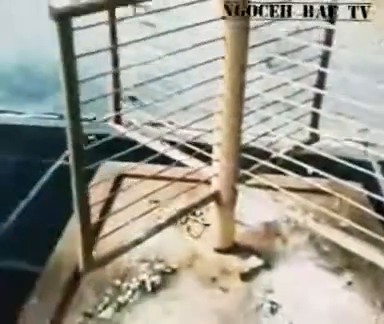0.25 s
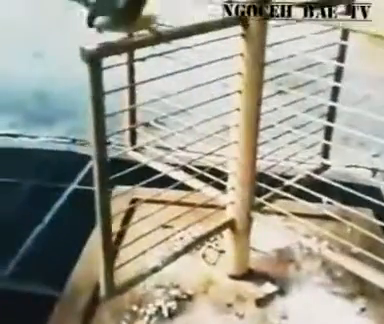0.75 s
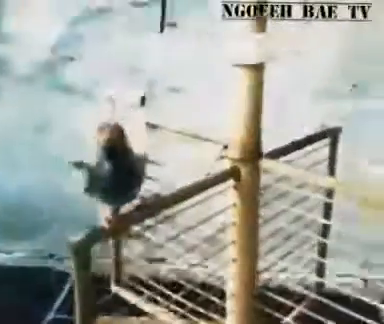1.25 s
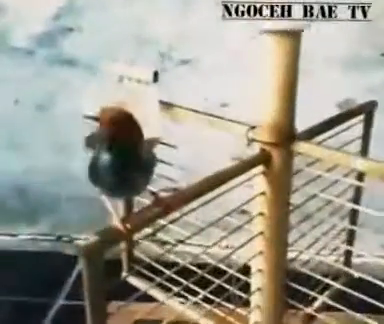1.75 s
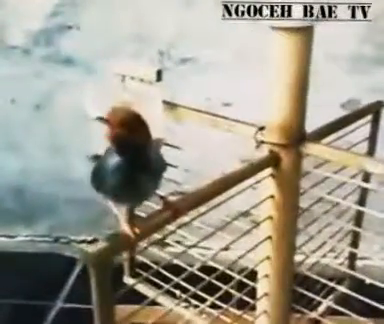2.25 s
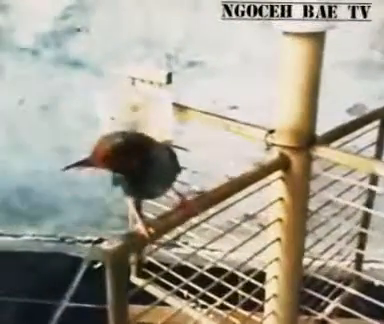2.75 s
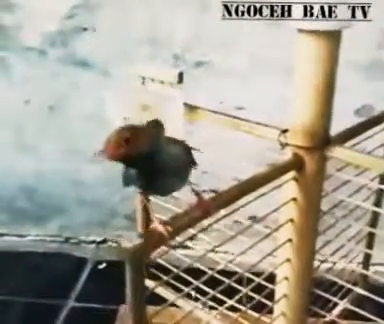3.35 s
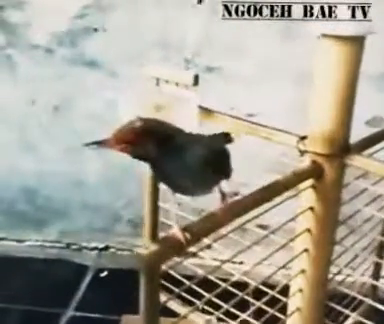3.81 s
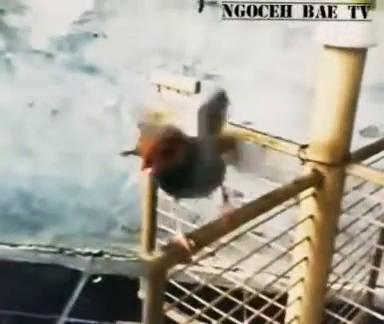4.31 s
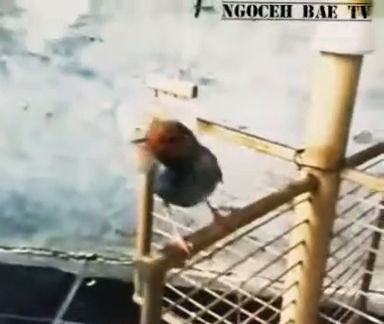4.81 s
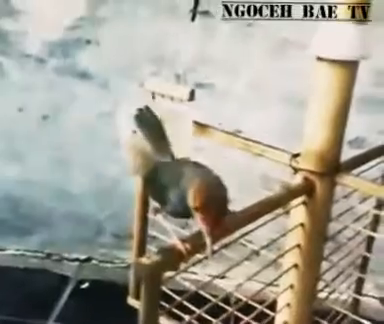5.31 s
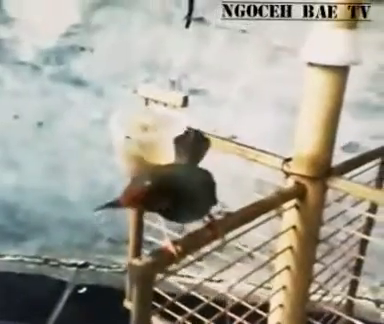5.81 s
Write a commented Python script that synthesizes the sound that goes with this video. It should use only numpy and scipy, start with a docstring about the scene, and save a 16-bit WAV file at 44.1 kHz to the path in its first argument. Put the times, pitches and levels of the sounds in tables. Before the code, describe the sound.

A small songbird on an outdoor terrace, heard close through a simple mono microphone with hard, peaky sound. First comes bright scratching and hollow rustle, then pairs or triplets of quick ticks lead into crisp downward chew calls, with a few scooping whistles between them. Hard walls answer with short noisy echoes. Faint low thumps, barely audible distant notes, steady hiss and slight hum lie behind the calls.

```python
"""A rustle near the cage, with sharp scratches of shaped noise, fills most of the first two seconds.
From 1.3 s small songbirds call close by on a hard-walled terrace: very quick sweeps heard as ticks,
a falling "chew" with an arched note, and whistles, all near sines with echoes of decaying noise.
A few low thumps and faint far notes come and go; hiss, rumble and a faint hum last throughout.
One microphone with a peaky, steeply falling response feeds both channels."""
import sys
import numpy as np
from scipy import signal
from scipy.fft import rfft, irfft
from scipy.io import wavfile

SR = 44100
rng = np.random.default_rng(int(sys.argv[2]) if len(sys.argv) > 2 else 0)


def persist_wave(psi):
    """Save psi, clipped to +-1, as 16-bit WAV."""
    counts = np.round(np.clip(psi, -1, 1) * 32767).astype(np.int16)
    wavfile.write(sys.argv[1], SR, np.atleast_2d(counts).T)


N = 267687

# All levels in the tables apply ahead of the microphone and the limiter, except those of the treble hiss.
# The chew calls: (time [s], fall level [dB], arch level [dB], echo against the note [dB],
# pitch factor, tempo factor, onset against the fall [dB], ringing echo against the note [dB],
# treble sizzle against the fall [dB])
CHEW_CALLS = [(1.4032, -11.5, -9, -4.5, 1.05, 0.72, -1.5, -8, -17),
              (1.696, -13, -11, -7.5, 1.064, 1.36, -39, -33, -40),
              (2.157, -34, -36.5, 6.5, 0.95, 0.88, 15, 16.5, -33),
              (2.2483, -15.5, -21, -8, .98, .81, -4.5, -25, -53),
              (2.93, -15, -20.5, -7.5, .98, 0.86, -4.5, -10, -41),
              (3.4367, -14, -20, -7.5, 0.99, 0.96, -3, 2, -41),
              (3.938, -15.5, -20, -8, 1, 1.01, -3.5, -4, -43),
              (4.834, -12.5, -21, -4, 1, 0.95, -4, -21, -34),
              (4.918, -25.5, -35.5, -2, .97, .95, 10, 7.5, -47),
              (5.5295, -14.5, -18.5, -8, 1.012, 0.92, -13, -5, -32)]
# Ticks, the farther ones mostly echo: (time [s], level [dB], centre of the sweep [Hz], echo against the tick [dB])
TICK_CALLS = [(1.3352, -16, 6300, 12), (1.3503, -9, 5340, 9), (1.3646, -9.5, 5730, 8.5),
              (2.118, -26.5, 4380, 20.5), (2.128, -35.5, 6100, 18), (2.143, -37, 5330, 21),
              (2.1886, -12, 5600, -2), (2.204, -6.5, 5720, -2), (2.2191, -22, 5480, 0),
              (2.8783, -14, 5230, 0), (2.8935, -10.5, 5600, -1), (3.0806, -36.5, 5820, 1),
              (3.378, -30, 5640, 7), (3.3834, -12.5, 5660, 4.5), (3.3988, -6, 5480, -2),
              (3.6096, -30.5, 6060, 3), (3.784, -37, 5240, 1), (3.875, -18, 5720, 0),
              (3.8905, -8.5, 5800, 0), (3.9057, -6.5, 5270, -8.5), (4.774, -8.5, 5820, 2.5),
              (4.789, -9, 5600, 0.5), (4.806, -8, 5760, -16), (4.86, -37, 4540, 24.5),
              (4.873, -41.5, 4900, 22), (4.899, -32.5, 5380, 20), (5.4773, -10, 6120, -1.5),
              (5.4908, -15, 5650, 5.5), (5.506, -12, 5200, -3), (6.026, -37, 5370, 5)]
# Whistles: ((start [s], hold [s], rise [s], top [s]), (onset, held, top pitch [Hz]),
# (onset, held, before the rise, top level [dB]), (place of the catch [share of the rise], its level change [dB]),
# overtone level [dB], echo against the whistle [dB])
WHISTLE_CALLS = [((1.288, .02, .012, .002), (4770, 4770, 4680), (-28, -31, -28, -26), (.0, -6), -72, -8),
                 ((1.6155, .005, .024, .018), (3300, 2940, 3770), (-3, -1, 0, -8), (.85, -8), -31, -11),
                 ((1.968, .104, .024, .006), (3470, 2800, 3430), (-11.5, -22, -7, -10), (.3, -16),
                 -43, -15), ((2.262, .008, .042, .001), (4920, 4980, 6600), (-30.5, -29.5, -24, -20),
                 (.1, -6), -62, -5), ((2.449, .01, .055, .001), (4480, 4640, 6180), (-30, -28, -22, -18),
                 (.2, -6), -62, -5), ((4.7255, .097, .046, .004), (3294, 2775, 3490), (-19, -22, -19, -14),
                 (.25, -12), -41, -10)]
# How the surroundings swell and sink: (time [s], rumble level [dB], treble hiss level [dB])
SURROUNDING_LEVELS = [(0.0, -47.5, -56), (0.3, -54.5, -87), (0.8, -60, -69), (1.3, -54.5, -57),
                      (1.55, -60.5, -63.5), (2.6, -57.5, -63.5), (3.4, -63.5, -66), (4.1, -61, -60),
                      (4.6, -68, -61.5), (4.95, -60, -57), (5.5, -63.5, -63), (6.07, -68.5, -62.5)]

ARCH_START_S = .028  # after the start of the fall, at tempo factor 1
WHISTLE_ATTACK_S = .005


def from_db(db):
    """Turns decibels into an amplitude factor."""
    return 10 ** (np.asarray(db) / 20)


def rms_one(x):
    """Scales a signal to an rms of 1."""
    return x / np.sqrt(np.mean(x ** 2) + 1e-20)


def at_hz(points, hz):
    """Reads a (frequency, level) curve, straight between its points on a logarithmic frequency scale."""
    curve_hz, curve_db = np.array(points).T
    return np.interp(np.log(hz + 1), np.log(curve_hz), curve_db)


def add(track, s, x):
    """Mixes x into the track from time s."""
    i = round(s * SR)
    track[i:i + len(x)] += x[:N - i]


def drift(rate):
    """A random wander of spread 1: noise smoothed twice at the given rate in Hz."""
    r = np.exp(-2 * np.pi * rate / SR)
    wander = signal.lfilter([1], [1, -2 * r, r * r], rng.standard_normal(N + SR))
    return rms_one(wander[SR:])  # the first second lets the filter settle


def noise(spectrum):
    """Noise of the given colour, rms 1."""
    gain = from_db(at_hz(spectrum, np.fft.rfftfreq(N, 1 / SR)))
    return rms_one(irfft(rfft(rng.standard_normal(N)) * gain, N))


def birds():
    """All calls: the sound that arrives directly, and what is sent to the walls."""
    arch_echo_db = -6.5  # the low arch reaches the walls more weakly than the fall
    hollow_hz, hollow_width_hz = 4300, 600  # some echoes come back ringing in this band
    direct, sent, hollow = np.zeros((3, N))
    for start, fall_db, arch_db, echo_db, higher, slower, onset_db, hollow_db, _ in CHEW_CALLS:
        fall, arch = chew(fall_db, arch_db, higher, slower, onset_db)
        arch_start = start + ARCH_START_S * slower
        for s, note, wall_db in (start, fall, echo_db), (arch_start, arch, echo_db + arch_echo_db):
            add(direct, s, note)
            add(sent, s, note * from_db(wall_db))
            add(hollow, s, note * from_db(hollow_db))
    for start, level_db, hz, echo_db in TICK_CALLS:
        sound = from_db(level_db) * tick(hz)
        add(direct, start - .0015, sound)  # its middle comes 0.8 ms after the listed time
        add(sent, start - .0015, sound * from_db(echo_db))
    for (start, *lengths), pitches, levels_db, catch, overtone_db, echo_db in WHISTLE_CALLS:
        tone = whistle(lengths, pitches, levels_db, *catch, overtone_db)
        add(direct, start, tone)
        add(sent, start, tone * from_db(echo_db))
    ringing = signal.iirpeak(hollow_hz, hollow_hz / hollow_width_hz, SR)
    return direct, sent + signal.lfilter(*ringing, hollow + 1e-18)


def chew(fall_db, arch_db, higher, slower, onset_db):
    """One call: the pitch snaps down onto a steady slide, then an arched note climbs fast and sinks slowly."""
    # all times and pitches here are for tempo and pitch factors of 1
    fall_s, fall_attack_s, fall_release_s = .0225, .0015, .011
    slide_from_hz, slide_hz_per_s, snap_hz, snap_s = 4650, -130000, 2194, .0014
    # part-way down the voice breaks: the pitch steps down and the level dips
    break_at_s, break_s, break_hz, break_db = .0085, .0009, 300, -7
    onset_s = .0042  # the high start, strong in some calls and swallowed in others
    t = np.linspace(0, fall_s, 90)
    past = (t - break_at_s) / break_s
    fall_hz = slide_from_hz + slide_hz_per_s * t + snap_hz * np.exp(-t / snap_s)
    fall_hz -= break_hz * (1 + np.tanh(past)) / 2
    shape_db = envelope_db(t, fall_attack_s, fall_release_s)
    shape_db = shape_db + break_db * np.exp(-past ** 2) + onset_db * np.exp(-(t / onset_s) ** 4)
    fall = sing(t * slower, fall_hz * higher, fall_db + shape_db, 0 * t - 28,
                half_db=-48.0, flutter_db=1.8, hiss_db=-25)

    arch_s, arch_attack_s, arch_release_s = .03, .0047, .0069
    arch_top_hz, arch_depth_hz, top_at = 2467, 644, .33  # the top comes at this share of the note
    t = np.linspace(0, arch_s, 50)
    off_top = np.interp(t / arch_s, [0, top_at, 1], [1, 0, 1])
    arch_hz = arch_top_hz - arch_depth_hz * off_top ** 2
    level_db = arch_db + envelope_db(t, arch_attack_s, arch_release_s)
    arch = sing(t * slower, arch_hz * higher, level_db, 0 * t - 28,
                half_db=-48.0, flutter_db=1.8, hiss_db=-30)
    return fall, arch


def tick(hz):
    """A rising sweep about a millisecond long, too quick to hear as pitch, with a brief broad click of noise."""
    t = np.arange(-100, 100) / SR
    sweep = np.exp(-(t / .0006) ** 2) * np.sin(2 * np.pi * (hz * t + 3.5e5 * t ** 2))
    bright = signal.lfilter([1, -.8], [1], rng.standard_normal(len(t)))
    click = from_db(-10) * np.exp(-np.abs(t) / .0003) * bright  # strongest at the middle of the sweep
    return sweep + click


def whistle(lengths, pitches, levels_db, catch_at, catch_db, overtone_db):
    """A near sine that sets in, scoops to a held pitch, rises to a top and stays there."""
    scoop_s, release_s = .009, .007
    catch_s = .0021  # in its rise the whistle catches and dips
    waver = .0066  # the pitch wavers by this share
    hold, rise, top = lengths
    s = np.cumsum([0, WHISTLE_ATTACK_S, scoop_s, hold, rise, top, release_s])
    t = np.arange(0, s[-1], .001)
    pitch = np.interp(t, s, np.array(pitches)[[0, 0, 1, 1, 2, 2, 2]])
    pitch = pitch * (1 + waver * signal.resample(rng.standard_normal(len(t) // 12 + 2), len(t)))
    catch = np.exp(-((t - s[3] - catch_at * rise) / catch_s) ** 2)
    body_db = np.interp(t, s[1:5], levels_db) + catch_db * catch
    level_db = body_db + envelope_db(t, WHISTLE_ATTACK_S, release_s)
    # taking the body off lets the overtones keep their own level while the tone swells
    return sing(t, pitch, level_db, overtone_db - body_db, half_db=-2, flutter_db=1.02, hiss_db=-35.5)


def envelope_db(t, attack, release):
    """Rounded attack, hold and rounded release, from and to -45 dB."""
    before_hold = (1 - t / attack).clip(0)
    after_hold = (1 - (t[-1] - t) / release).clip(0)
    return -45 * (before_hold ** 2 + after_hold ** 2)


def sing(s, pitch, level_db, octave_db, half_db, flutter_db, hiss_db):
    """A near sine along a pitch curve, with a hoarse octave, a line between the two and a broad hiss."""
    t = np.arange(s[0], s[-1], 1 / SR)
    phase = 2 * np.pi * np.cumsum(np.interp(t, s, pitch)) / SR
    hoarse = signal.resample(rng.standard_normal((3, len(t) // 90 + 2)), len(t), axis=1)
    octave = (.5 + hoarse[0]) * np.sin(2 * phase)
    half = from_db(half_db) * (.5 + hoarse[1]) * np.sin(3 * phase / 2)  # at 1.5 times the pitch
    hiss = from_db(hiss_db + 2.84 * hoarse[1]) * rng.standard_normal(len(t))
    tone = np.sin(phase) + from_db(np.interp(t, s, octave_db)) * (octave + half) + hiss
    return from_db(np.interp(t, s, level_db) + flutter_db * hoarse[2]) * tone


def terrace(x):
    """Echoes off hard walls: dense near ones that die fast, then a longer diffuse tail."""
    early_db, early_t60_s, tail_t60_s = 9.5, .07, .28  # early level against the tail; times to fall by 60 dB
    t = np.arange(SR // 2) / SR
    sparse = rng.standard_normal(len(t)) * np.where(rng.random(len(t)) < .012, 6.0, .4)
    early = from_db(early_db - 60 * t / early_t60_s) * sparse
    tail = from_db(-60 * t / tail_t60_s) * rng.standard_normal(len(t))
    response = (early + tail) * (t > .002)
    return signal.fftconvolve(x, response / np.sqrt(np.sum(response ** 2)))[:N]


def rustle():
    """A grainy bright hiss and a hollow dull one swell and die away; scratches start sharply and fade."""
    # the rustling bed: (time [s], bright level [dB], dull level [dB])
    bed_levels = [(0.0, -43.5, -39.5), (0.3, -36, -39), (0.66, -40, -37.5), (0.84, -35.5, -39.5),
                  (1.15, -47.5, -44.5), (1.42, -43, -45), (1.63, -49, -49.5), (1.759, -35, -73),
                  (1.95, -75.5, -56)]
    # scratches within it: (time [s], level [dB], length [s])
    scratch_list = [(0.201, -30, 0.011), (0.223, -33, 0.0052), (0.263, -29.5, 0.011), (0.274, -27.5, .013),
                    (0.287, -25.5, 0.01), (0.3137, -28, 0.026), (0.37, -23.5, 0.0027), (0.402, -33, 0.023),
                    (.472, -39, 0.0057), (0.516, -36, .008), (0.664, -33.5, 0.036), (0.773, -33, 0.014),
                    (0.79, -26, 0.0027), (0.853, -34, 0.0074), (0.87, -29, 0.033), (0.947, -28.5, 0.013),
                    (1.083, -26.5, 0.007), (1.568, -35.5, 0.019)]
    # colours of the two hisses: (frequency [Hz], relative level per Hz [dB])
    dull_colour = [(130, -44.5), (210, -5.5), (320, -8), (400, -12), (540, -6), (650, -17), (950, -0.5),
                   (1400, -5.5), (1700, -18.5), (2300, -9), (3500, -14.5)]
    bright_colour = [(1000, -28), (2500, -13.5), (4000, -9.5), (4700, 4.5), (5200, 9), (5800, 1.5),
                     (7000, -3), (9000, -28.5), (14000, -13)]
    s, bright_db, dull_db = np.transpose(bed_levels)
    t = np.arange(N) / SR
    bright_level = from_db(np.interp(t, s, bright_db, right=-90) + 1.1 * drift(40))
    u = np.arange(round(.08 * SR)) / SR
    for start, scratch_db, length in scratch_list:
        stroke = np.exp(-(u / length) ** 4) + .25 * np.exp(-u / .015)
        add(bright_level, start, from_db(scratch_db) * (1 - np.exp(-u / .0017)) * stroke)
    grain = from_db(2.0 * drift(400))
    dull_level = from_db(np.interp(t, s, dull_db, right=-90) + 1.4 * drift(25))
    return bright_level * grain * noise(bright_colour) + dull_level * noise(dull_colour)


def thumps():
    """Low thumps of about one and a half swings each, under a bell-shaped swell."""
    # low thumps: (time of the middle [s], peak level [dB], frequency [Hz])
    thump_list = [(1.632, -32, 94.6), (2.205, -33.5, 108), (3.505, -32.5, 102), (4.221, -37, 100)]
    out, t = np.zeros(N), np.arange(-1000, 1000) / SR
    for centre, peak_db, hz in thump_list:
        swing = np.exp(-(t * hz / .62) ** 2) * np.cos(2 * np.pi * hz * t)
        add(out, centre + t[0], -from_db(peak_db) * swing)
    return out


def far_notes():
    """Soft gliding tones, blurred by distance: their strength and phase wander at random."""
    # faint far notes: (start [s], length [s], start pitch [Hz], end pitch [Hz], level [dB])
    note_list = [(0.524, 0.12, 2340, 2320, -44.5), (0.682, 0.027, 1840, 1820, -39),
                 (1.478, 0.055, 893, 924, -54), (1.565, 0.04, 985, 874, -45),
                 (1.944, 0.11, 955, 913, -56.5), (2.399, 0.19, 535, 615, -69),
                 (2.609, 0.11, 647, 526, -63.5), (2.699, 0.15, 517, 575, -66.5),
                 (2.622, 0.066, 3080, 3420, -49), (2.656, 0.056, 3240, 2800, -55),
                 (3.025, .05, 940, 960, -60), (3.142, 0.19, 660, 602, -68.5), (3.463, .13, 577, 646, -69.5),
                 (3.6, 0.064, 995, 974, -64), (5.701, 0.052, 1095, 1040, -61.5),
                 (5.843, 0.041, 1020, 970, -63.5)]
    out = np.zeros(N)
    for start, length, start_hz, end_hz, level_db in note_list:
        u = np.linspace(0, 1, round(length * SR))
        phase = 2 * np.pi * np.cumsum(start_hz + (end_hz - start_hz) * u) / SR
        step = int(SR / (.12 * start_hz))  # samples between two random values
        blur = signal.resample(rng.standard_normal((2, 80)), 80 * step, axis=1)[:, :len(u)]
        tone = (.6 + blur[0]) * np.sin(phase) + blur[1] * np.cos(phase)
        add(out, start, from_db(level_db) * np.sqrt(np.sin(np.pi * u).clip(0)) * tone)
    return out


def air_hiss():
    """A lasting hiss of shaped noise that swells gently."""
    # colour of the hiss: (frequency [Hz], relative level per Hz [dB])
    air_colour = [(60, -27), (120, -19), (200, -16), (500, -20.5), (750, -22.5), (1000, -17.5), (1500, -26),
                  (2400, -25), (3600, -26), (5400, -18), (7500, -23.5), (9000, -12)]
    return from_db(-47 + 1.5 * drift(4)) * noise(air_colour)


def rumble():
    """Low shaped noise that swells and sinks."""
    # colour of the rumble: (frequency [Hz], relative level per Hz [dB])
    rumble_colour = [(15, -5.5), (30, -2), (70, -11.5), (150, -18), (300, -27)]
    s, rumble_db, _ = np.transpose(SURROUNDING_LEVELS)
    level_db = np.interp(np.arange(N) / SR, s, rumble_db) + 2.5 * drift(4.4)
    return from_db(level_db) * noise(rumble_colour)


def hum():
    """A few sines of steady pitch whose levels drift a little."""
    # the lines of the hum: (frequency [Hz], rms level before the drift [dB])
    hum_lines = [(100, -71.5), (299, -73), (5566, -69)]
    t = np.arange(N) / SR
    out = np.zeros(N)
    for hz, db in hum_lines:
        out += np.sqrt(2) * from_db(db + .83 * drift(4.6)) * np.sin(2 * np.pi * hz * t)
    return out


def treble_hiss():
    """A thin hiss above the range of the microphone; it swells, flickers and sizzles briefly on calls."""
    # colour of the treble hiss: (frequency [Hz], relative level per Hz [dB])
    treble_colour = [(7600, -42.5), (8400, -8), (9500, -8), (11000, -5), (14000, -8.5)]
    s, _, treble_db = np.transpose(SURROUNDING_LEVELS)
    level = from_db(np.interp(np.arange(N) / SR, s, treble_db) + 1.1 * drift(15))
    # each sizzle: (start [s], level [dB], length [s]), its level set against that of the call
    sizzles = [(row[0], row[1] - 37.5, .0028) for row in TICK_CALLS]
    sizzles += [(row[0], row[1] + row[-1], .016) for row in CHEW_CALLS]
    for (start, *_), _, (onset_db, *_), *_ in WHISTLE_CALLS:
        sizzles.append((start + WHISTLE_ATTACK_S, onset_db - 32.5, .028))
    u = np.arange(round(.08 * SR)) / SR
    for start, sizzle_db, length in sizzles:
        add(level, start, from_db(sizzle_db) * (1 - np.exp(-u / .0006)) * np.exp(-(u / length) ** 2))
    return level * noise(treble_colour)


def microphone(x):
    """Colours the sound by a response with the least possible delay (minimum phase)."""
    # microphone response: (frequency [Hz], gain [dB])
    mic_curve = [(20, 1.5), (1300, 7), (1650, 6), (2300, 4.5), (3400, 2.5), (3650, -6.5), (3900, 3),
                 (4600, 2.5), (7200, 4.5), (7550, 2), (7900, -25.5), (8400, -51.5), (9500, -18.5),
                 (14000, -17)]
    size = 4096
    log_gain = at_hz(mic_curve, np.fft.rfftfreq(size, 1 / SR)) * np.log(10) / 20
    # folding the cepstrum forward in time makes the response minimum phase
    cepstrum = irfft(log_gain, size)
    cepstrum[1:size // 2] *= 2
    cepstrum[size // 2 + 1:] = 0
    response = irfft(np.exp(rfft(cepstrum)), size)
    return signal.fftconvolve(x, response[None], axes=1)[:, :N]


def limiter(x):
    """Turns the gain down fast on peaks over the ceiling and lets it creep back."""
    ceiling_db, release_db_per_s, attack_s = -10, 150, .00008
    over_db = np.maximum(20 * np.log10(np.abs(x) + 1e-9) - ceiling_db, 0)
    slope = release_db_per_s * np.arange(N) / SR
    held_db = np.maximum.accumulate(over_db + slope, axis=1) - slope
    r = np.exp(-1 / (attack_s * SR))
    return x * from_db(-signal.lfilter([1 - r], [1, -r], held_db))


def scene():
    """Mixes the birds, their echoes and everything around them, the same in both channels."""
    direct, sent = birds()
    calls = direct + terrace(sent)
    background = air_hiss() + rumble() + hum()
    mono = calls + rustle() + thumps() + far_notes() + background
    return np.array([mono, mono])


def record(dry):
    """The microphone colours, treble hiss joins, a limiter holds the peaks, and the top is cut."""
    limited = limiter(microphone(dry) + treble_hiss())
    top_cut = signal.cheby2(12, 70, 14600, fs=SR, output="sos")  # 70 dB down from 14600 Hz upward
    return signal.sosfilt(top_cut, limited)


dry = scene()
out = record(dry)
persist_wave(out)
```